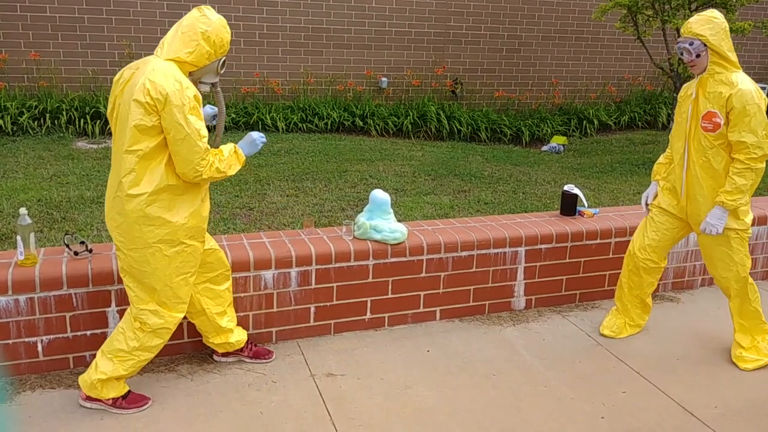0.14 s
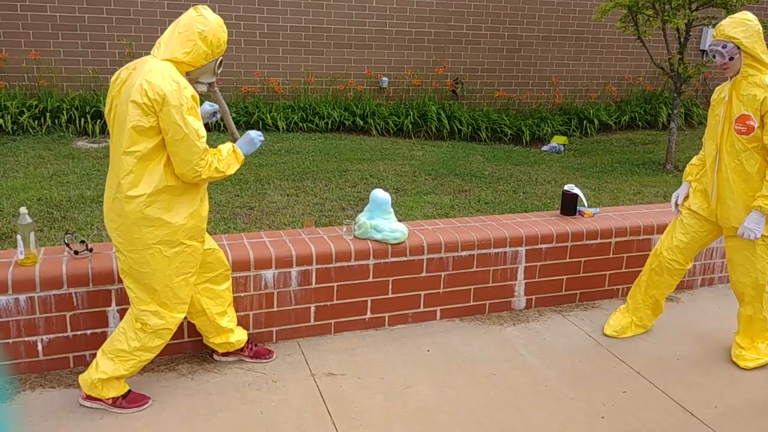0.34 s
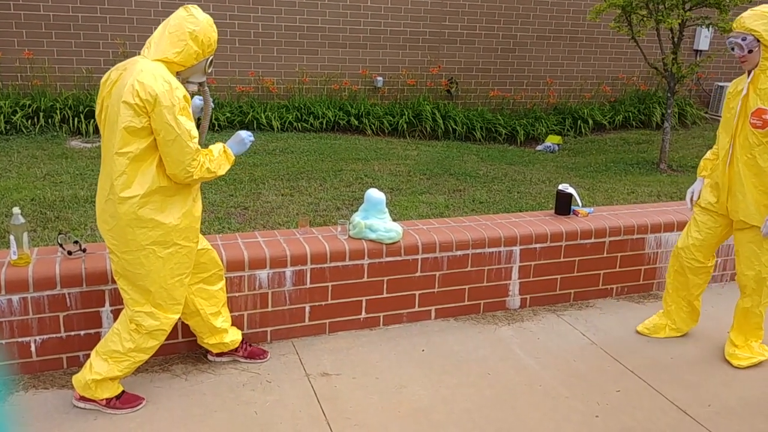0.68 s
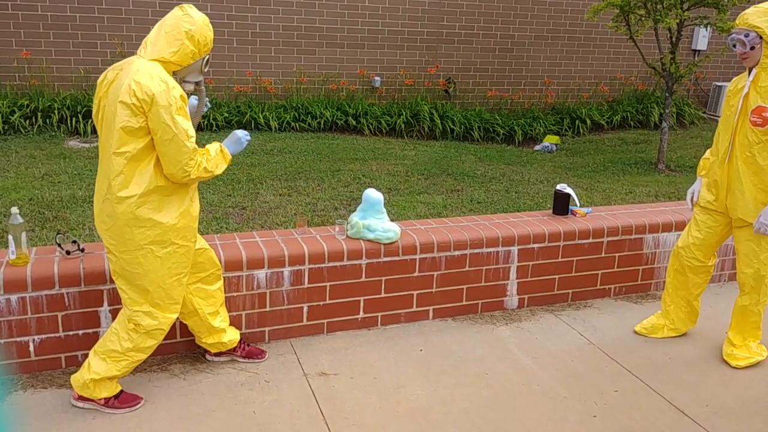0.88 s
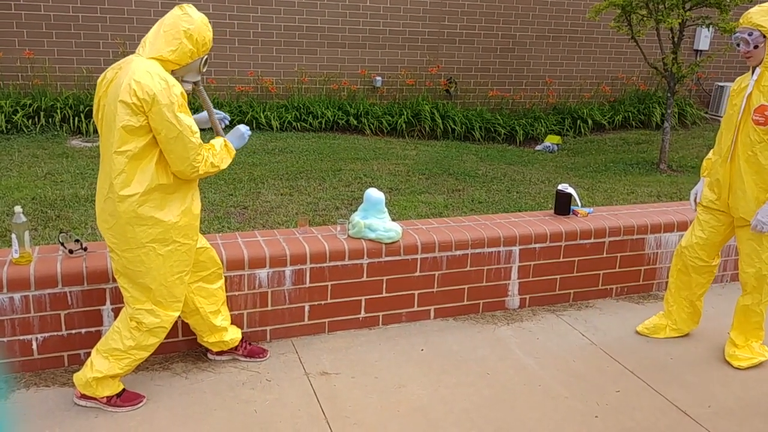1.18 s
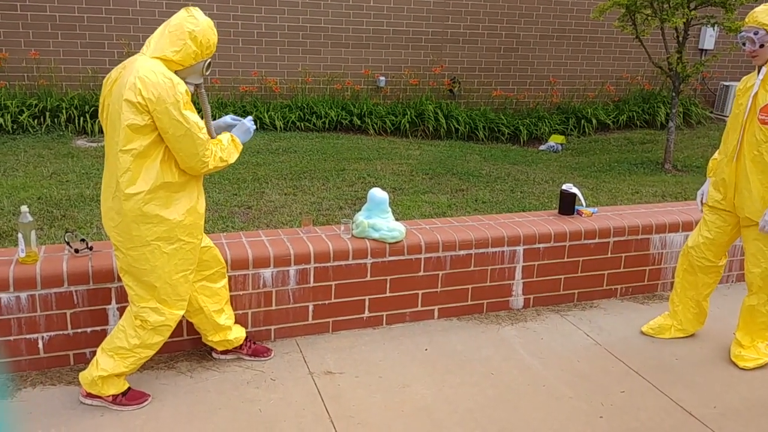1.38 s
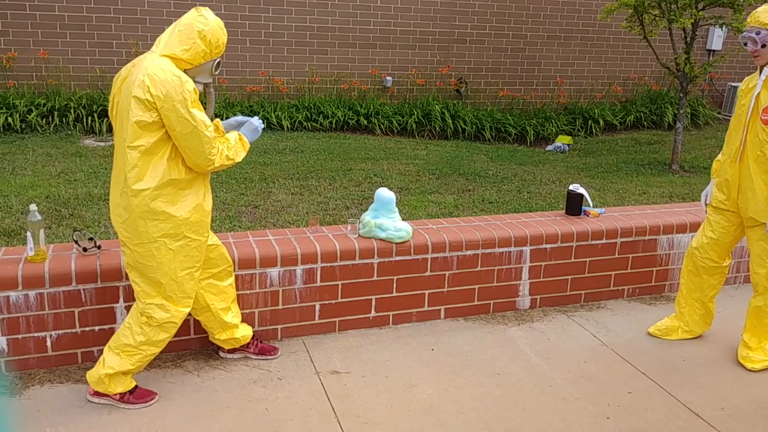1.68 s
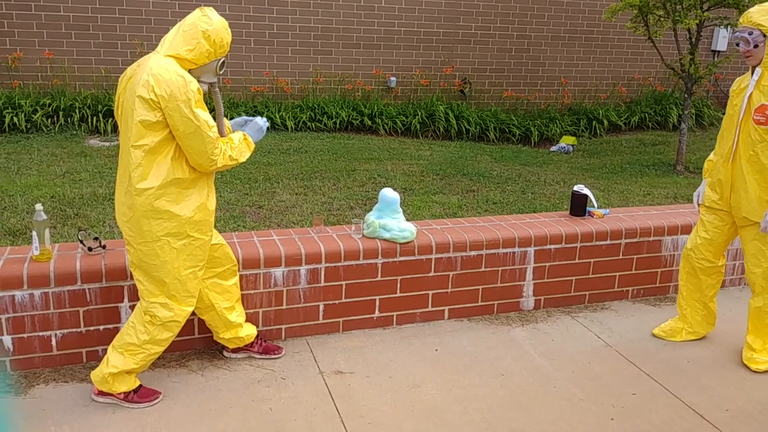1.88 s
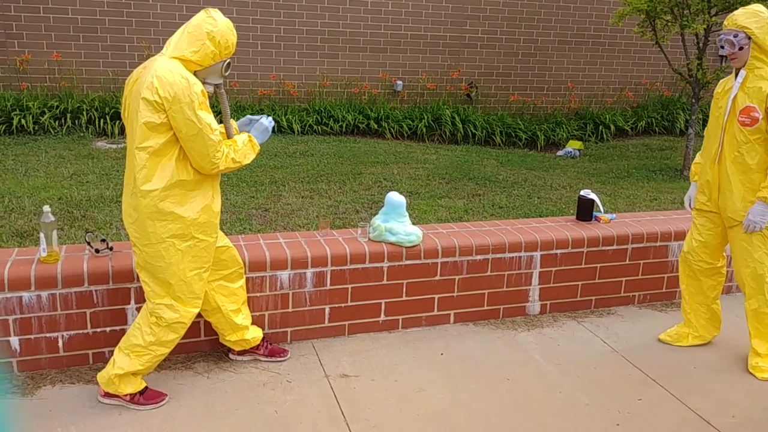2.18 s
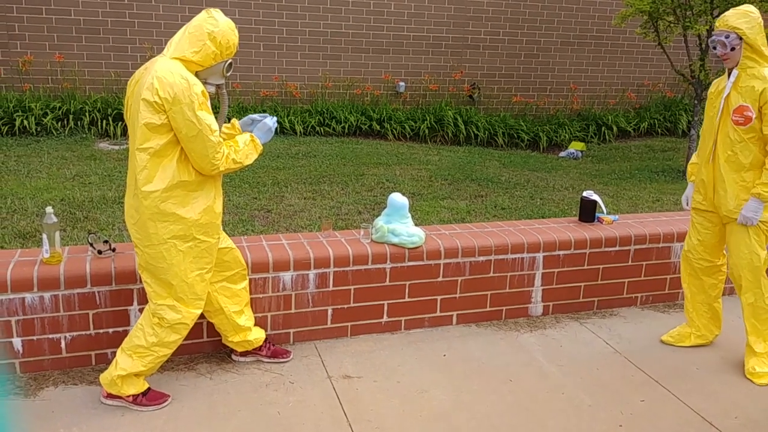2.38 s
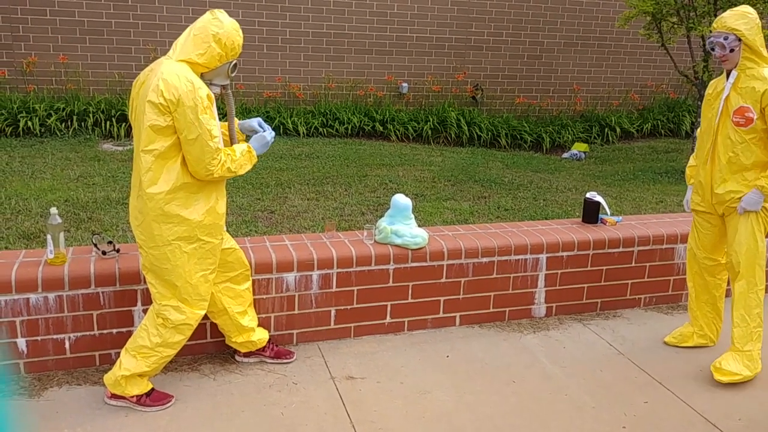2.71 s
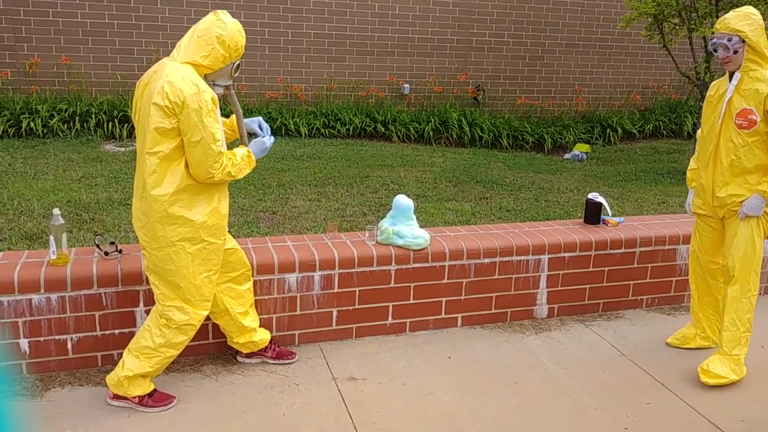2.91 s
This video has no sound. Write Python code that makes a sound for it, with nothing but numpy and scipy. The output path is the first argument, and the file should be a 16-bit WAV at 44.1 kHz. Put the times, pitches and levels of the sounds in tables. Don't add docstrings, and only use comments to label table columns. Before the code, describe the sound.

A matchbox is handled with faint stick ticks, a foot scuffs paving, birds chirp, then a match scrapes in hollow snags without igniting and stiff coverall fabric crinkles; open yard, distant engine, left brighter than right.

```python
import sys
import numpy as np
from scipy import signal
from scipy.fft import rfft, irfft, next_fast_len
from scipy.io import wavfile

SR = 44100
rng = np.random.default_rng(int(sys.argv[2]) if len(sys.argv) > 2 else 0)


def level_to_linear(level):
    exponent = np.asarray(level, float) / 20
    return 10 ** exponent


def to_wav(sig):
    pcm = np.clip(np.atleast_2d(sig), -1, 1) * 32767
    pcm = np.round(pcm).astype(np.int16)
    wavfile.write(sys.argv[1], SR, pcm.T)


N = 134505
T = np.arange(N) / SR


def rms_one(x):
    return x / np.sqrt(np.mean(x ** 2) + 1e-20)


def at_hz(points, hz):
    p = np.array(points, float)
    return np.interp(np.log(np.maximum(hz, 1)), np.log(p[:, 0]), p[:, 1])


def drift(rate_hz):
    r = np.exp(-2 * np.pi * rate_hz / SR)
    slow = signal.lfilter([1], [1, -2 * r, r * r], rng.standard_normal(N + SR))
    return rms_one(slow[SR:])


def band(x, low_hz, high_hz):
    sos = signal.butter(2, [low_hz, min(high_hz, SR / 2.2)], "band", fs=SR, output="sos")
    return signal.sosfilt(sos, x)


def pan(left_db, right_db):
    return level_to_linear(np.array([[left_db], [right_db]]))


def echoes(x, t60_s, wet_db):
    t = np.arange(SR // 4) / SR
    tail = rng.standard_normal((2, len(t))) * level_to_linear(-60 * t / t60_s) * (t > .001)
    tail = tail / np.sqrt((tail ** 2).sum(axis=1, keepdims=True))
    reflected = signal.fftconvolve(x + np.zeros((2, 1)), tail, axes=1)[:, :N]
    return x + level_to_linear(wet_db) * reflected


def rub(effort, per_s, spread_db, flutter_db, low_hz, high_hz):
    sizes = level_to_linear(spread_db * np.minimum(rng.exponential(1, (3, N)), 5))
    sizes = sizes * rng.choice([-1, 1], (3, N))
    grit = band(sizes * (rng.random((3, N)) < per_s / SR), low_hz, high_hz)
    both = grit[0] + 0.31 * band(grit[1:], 2260, 21600)
    edges_hz = [100, 1800, 3700, 6300, 19000]
    coloured = np.zeros((2, N))
    for k, (low, high) in enumerate(zip(edges_hz, edges_hz[1:])):
        coloured += band(both, low, high) * level_to_linear(1.7 * drift(30)) * (-1) ** k
    s, db = np.transpose(effort)
    level_db = np.interp(T, s, db, -140, -140) + flutter_db * drift(34.0)
    return rms_one(coloured) * level_to_linear(level_db)


def snaps(rows, trim_db, low_hz, high_hz):
    out = np.zeros((2, N + SR))
    t = np.arange(3000) / SR
    for s, db, t60 in rows:
        noise = rng.standard_normal((3, len(t)))
        crack = 1.2 * level_to_linear(-60 * t / .004) * np.sign(noise[0])
        decay = level_to_linear(db + trim_db - 60 * t / np.clip(t60, .004, .15))
        i = int(s * SR)
        out[:, i:i + len(t)] += decay * (noise[0] + 0.56 * noise[1:] + crack)
    return band(out[:, :N], low_hz, high_hz)


# t/s, level/dB
SCRATCH = [
    (2.33, -71),
    (2.35, -50),
    (2.445, -48),
    (2.47, -45.5),
    (2.51, -34.5),
    (2.53, -46.5),
    (2.585, -39.5),
    (2.61, -51),
    (2.64, -69),
]
# t/s, peak level/dB, ring t60/s
SNAGS = [(2.342, -36, .03), (2.348, -29, .04), (2.373, -23, .04), (2.407, -34, .015), (2.4505, -28, .02),
         (2.458, -14, .03), (2.4605, -17, .03), (2.465, -22, .03), (2.469, -21, .035), (2.4785, -14, .022),
         (2.482, -19, .02), (2.484, -14, .025), (2.489, -17, .03), (2.496, -16, .025), (2.5005, -18, .035),
         (2.5115, -19, .035), (2.518, -24, .025), (2.5395, -17, .04), (2.568, -27, .03), (2.573, -17, .035),
         (2.579, -24, .025), (2.583, -23, .035), (2.598, -19, .025), (2.65, -31, .04), (2.667, -30, .04),
         (2.715, -34, .03), (2.739, -30, .04)]
# t/s, level/dB
FUMBLE = [
    (0, -50),
    (.032, -57),
    (.082, -47),
    (.132, -57),
    (.185, -42),
    (.242, -53),
    (.264, -48),
    (.285, -58),
    (.37, -62),
    (.41, -70),
]


def matchbox():
    box_hz, width_hz = 2656, 370
    box = rub(SCRATCH, 3800, 2.28, 0.84, 1000, 9000) + snaps(SNAGS, -9.0, 2116, 8300)
    box = box + rub(FUMBLE, 6000, 2.7, 0.17, 170, 9500)
    ring = signal.lfilter(*signal.iirpeak(box_hz, box_hz / width_hz, SR), box)
    thud = snaps(SNAGS, -14, 352, 410.0)
    return box + level_to_linear(2.5) * ring + thud


# t/s, peak level/dB, ring t60/s
TICKS = [(.002, -36, .03), (.013, -36, .02), (.0613, -40, .02), (.0812, -40, .02), (.114, -43, .012),
         (.1575, -39, .02), (.1765, -34, .03), (.195, -33, .025), (.2613, -35, .015), (.308, -44, .01),
         (.326, -43, .012), (.368, -45, .01), (.713, -46, .01), (.7705, -31, .012), (.7835, -37, .012),
         (.804, -47, .015), (1.137, -48, .02), (1.194, -48, .015), (1.30, -52, .02), (1.423, -52, .015),
         (2.149, -48, .03), (2.27, -50, .02), (2.29, -50, .02), (2.9933, -45, .02), (2.9993, -41, .02),
         (3.0257, -42, .02)]


def loose_matches():
    return snaps(TICKS, -8.5, 1100, 6700)


# t/s, level/dB
SLEEVE = [
    (2.2, -70),
    (2.3, -67.5),
    (2.62, -46.5),
    (2.748, -42.5),
    (2.766, -44),
    (2.82, -49.5),
    (2.85, -62),
    (2.98, -61),
    (3.0, -50),
    (3.05, -50.5),
]


def coverall():
    sleeve = rub(SLEEVE, 9000, 2.59, 2.12, 250.3, 8700)
    cuffs = rub(FUMBLE, 3300, 3.9, 3.9, 590, 1380)
    return sleeve + level_to_linear(-8) * cuffs


# t/s, level/dB
SCUFF = [
    (.41, -67),
    (.442, -49.5),
    (.484, -39),
    (.582, -33.5),
    (.66, -37.5),
    (.672, -46),
    (.72, -71.5),
    (.9, -72),
    (1.0, -100),
]


def shoe_cover():
    return rub(SCUFF, 16000, 1.8, 1.5, 160, 14600)


def person():
    notch_hz, width_hz = 650, 130
    near = matchbox() + loose_matches() + coverall() + shoe_cover()
    near = signal.lfilter(*signal.iirnotch(notch_hz, notch_hz / width_hz, SR), near)
    return echoes(near, t60_s=.07, wet_db=-12)


def bird(rows, sag, glide, hook_hz, swell, wobble_db):
    out, waver = np.zeros(N + SR), drift(51)
    for s, length, start_hz, end_hz, db in rows:
        i = int(s * SR)
        u = np.arange(min(int(length * SR), N - i)) / (length * SR)
        bend = (1 - glide) * (1 - u) ** sag + glide * (1 - u)
        hz = end_hz + (start_hz - end_hz) * bend - hook_hz * u ** 6
        hz = hz + 25 * waver[i:i + len(u)][::-1]
        fades = np.minimum(u, 1 - u) / .08
        shape = np.minimum(np.minimum(1, .36 + (u / swell) ** 4), fades)
        out[i:i + len(u)] += level_to_linear(db + 4) * shape * np.sin(2 * np.pi * np.cumsum(hz) / SR)
    return out[:N] * level_to_linear(wobble_db * waver)


# t/s, length/s, start f/Hz, end f/Hz, level/dB
SLURS = [
    (.19, .28, 4050, 2850, -65),
    (1.065, .29, 4050, 2900, -63),
    (1.87, .28, 4100, 2850, -59.5),
    (2.66, .275, 4100, 2850, -58.5),
]
# t/s, length/s, start f/Hz, end f/Hz, level/dB
WHISTLES = [
    (1.41, .04, 2400, 2300, -73),
    (1.46, .12, 2200, 1950, -76),
    (1.59, .075, 5300, 5148, -66),
    (1.695, .045, 5250, 5100, -65),
    (1.725, .04, 7000, 5100, -74),
    (1.755, .08, 5200, 4480, -65),
    (1.765, .05, 5600, 5150, -65),
    (2.2, .13, 2400, 1978, -71),
    (2.39, .05, 3700, 3200, -62),
]


def whistling_bird():
    song = bird(SLURS, 5, .6, 330, .8, 2.0) + bird(WHISTLES, 1.5, 0, 0, .2, 3.0)
    song = song + level_to_linear(-17) * np.roll(song, int(.078 * SR))
    return echoes(song, t60_s=.3, wet_db=-2) * pan(-1.5, 1.5)


# t/s, length/s, start f/Hz, end f/Hz, level/dB
CHIRPS = [(.865, .06, 6020, 5950, -79), (.922, .045, 5900, 4350, -71), (.91, .06, 5100, 4750, -73),
          (.97, .064, 7000, 4820, -66), (1.04, .08, 4900, 4950, -78), (1.118, .035, 5900, 4600, -74),
          (1.232, .026, 3700, 4900, -69), (1.495, .022, 4100, 4900, -68), (1.655, .024, 6300, 7600, -77),
          (1.783, .064, 6800, 4800, -63), (1.825, .022, 6500, 7300, -78), (1.865, .06, 5480, 5350, -72),
          (2.022, .05, 6200, 4750, -70), (2.08, .06, 4600, 4550, -75), (2.108, .028, 6100, 5940, -66)]
# t/s, length/s, start f/Hz, end f/Hz, level/dB
SWOOPS = [
    (1.16, .07, 7900, 6100, -70),
    (1.41, .076, 8000, 6150, -70),
]
# t/s, length/s, start f/Hz, end f/Hz, level/dB
HOLDS = [
    (2.148, .105, 5500, 4560, -60),
]


def small_bird():
    song = bird(CHIRPS, 2.4, .1, 0, .35, 3.5) + bird(SWOOPS, .8, 0, 900, .9, 2.5)
    song = song + bird(HOLDS, 7, .05, 0, .4, 1.0)
    song = song + level_to_linear(-7) * np.roll(song, int(.02 * SR))
    return echoes(song, t60_s=.15, wet_db=-5) * pan(3, -3)


# t/s, f/Hz, level/dB
ENGINE = [(0, 75.9, -45.5), (.2, 77.33, -36.5), (.45, 76.43, -44.5), (.78, 77.26, -41.5),
          (0.919, 78.1, -30.5), (1.019, 80.2, -51), (1.108, 85.7, -37), (1.352, 106.3, -43.5),
          (1.62, 122, -47.5), (1.802, 134, -45.5), (2.699, 137.2, -41.5), (2.902, 137.4, -47)]
# f/Hz, width/Hz, level at start/dB, level at end/dB
DRONES = [
    (145.8, 11.7, -51.5, -70.5),
    (109.4, 4.3, -45, -81),
    (92.85, 22, -70, -40.5),
    (62.8, 6.2, -67, -53.5),
    (214.5, 6.3, -57.5, -76),
]


def engine():
    s, hz, db = np.transpose(ENGINE)
    pitch = np.interp(T, s, hz) + 2.49 * drift(6.2)
    level_db = np.interp(T, s, db) - 1.5 + 2.0 * drift(22.5)
    out = level_to_linear(level_db) * np.sin(2 * np.pi * np.cumsum(pitch) / SR)
    passage = 1 / (1 + np.exp((1.5 - T) / 1.37))
    for hz, width, start_db, end_db in DRONES:
        phase = 2 * np.pi * hz * T
        drone = drift(width) * np.sin(phase) + drift(width) * np.cos(phase)
        out += level_to_linear(start_db + (end_db - start_db) * passage) * drone
    return out * pan(.4, -.4)


# f/Hz, level/dB
TOWN = [(30, -59), (70, 9), (150, -4.5), (400, -14), (800, -22.5), (2600, -30.5), (4800, -30),
        (8000, -41.5)]
# f/Hz, correlation/1
LIKENESS = [(60, 0.33), (300, 0.93), (700, 0.32), (1500, 0.035)]


def town():
    hz = np.arange(N // 2 + 1) * SR / N
    mid, side = rfft(rng.standard_normal((2, N)))
    alike = np.clip(at_hz(LIKENESS, hz), 0, 1)
    both = np.sqrt(1 + alike) * mid + np.sqrt(1 - alike) * side * np.array([[1], [-1]])
    rumble = rms_one(irfft(both * level_to_linear(at_hz(TOWN, hz)), N))
    lull_db = 4.0 * np.exp(-((T - 1.15) / 0.28) ** 2)
    return level_to_linear(-50 + 1.57 * drift(3.1) - lull_db) * rumble


def scene():
    return person() + whistling_bird() + small_bird() + engine() + town()


def port(x, points):
    size = next_fast_len(N + 4096)
    size += size % 2
    hz = np.arange(size // 2 + 1) * SR / size
    fold = irfft(np.log(level_to_linear(at_hz(points, hz))), size)
    fold[1:size // 2] *= 2
    fold[size // 2 + 1:] = 0
    return irfft(rfft(x, size) * np.exp(rfft(fold)), size)[:N]


# f/Hz, level/dB
LEFT_PORT = [(500, 5), (1700, 0.5), (2700, 2), (3600, 1.5), (6600, 1), (7700, 10), (9000, -2), (10200, -39),
             (11200, -28), (15500, -7)]
RIGHT_PORT = [(500, 0.5), (1200, 1), (1900, -10), (2550, 7), (3500, -0.5), (6000, -11), (7200, -31),
              (10000, -37),
              (12500, -40), (15500, -34)]


def microphones(dry):
    left = port(dry[0], LEFT_PORT)
    right = port(dry[1], RIGHT_PORT)
    return np.array([left, right])


def top_cut(x):
    return signal.sosfilt(signal.butter(12, 15750, fs=SR, output="sos"), x)


def record(dry):
    mix = microphones(dry) + level_to_linear(-74) * rng.standard_normal((2, N))
    mix = band(mix, 51.0, 19000)
    return top_cut(mix)


dry = scene()
out = record(dry)
to_wav(out)
```